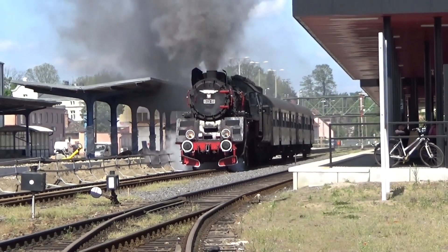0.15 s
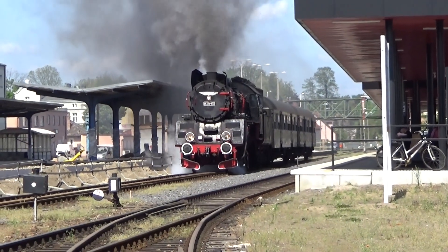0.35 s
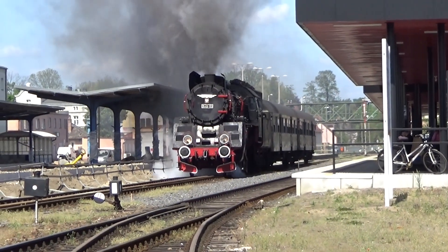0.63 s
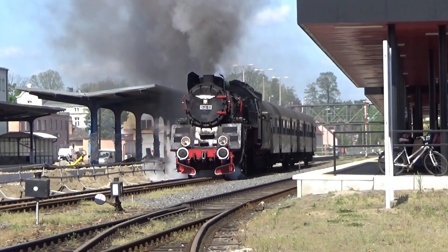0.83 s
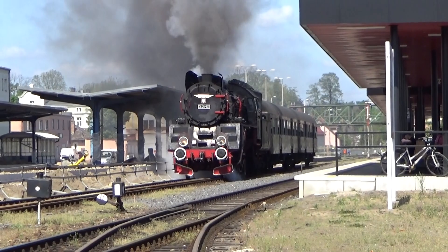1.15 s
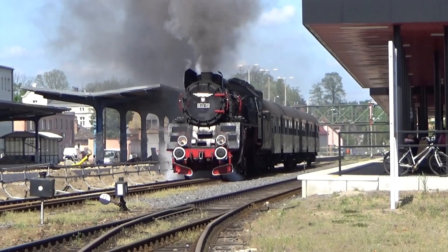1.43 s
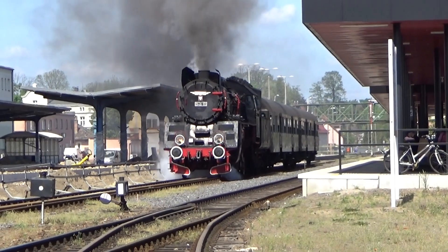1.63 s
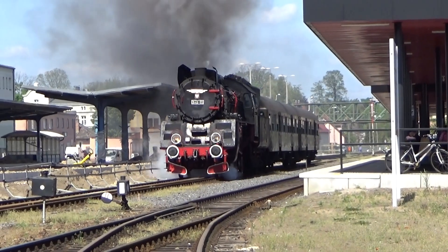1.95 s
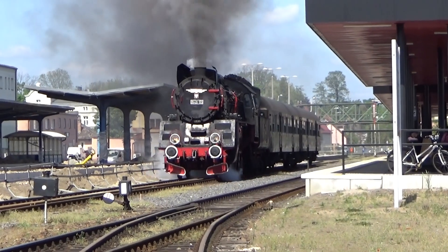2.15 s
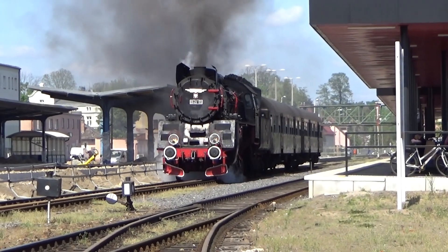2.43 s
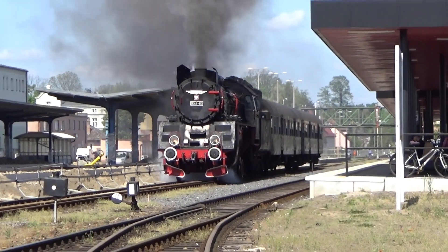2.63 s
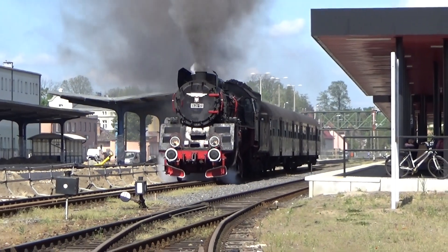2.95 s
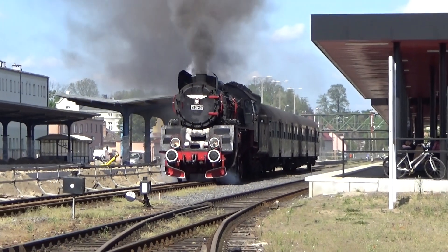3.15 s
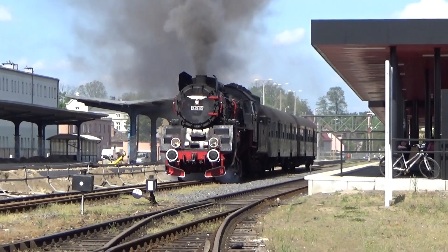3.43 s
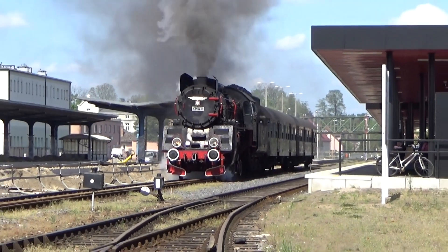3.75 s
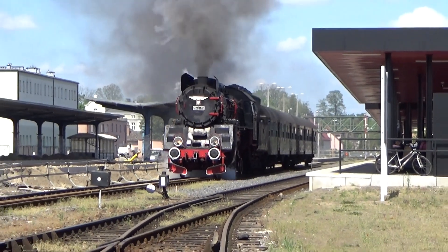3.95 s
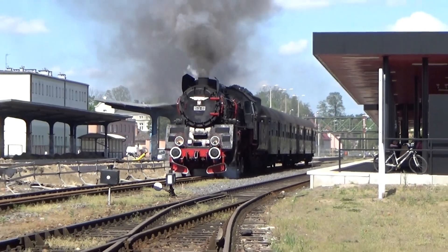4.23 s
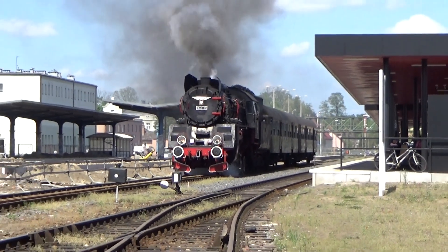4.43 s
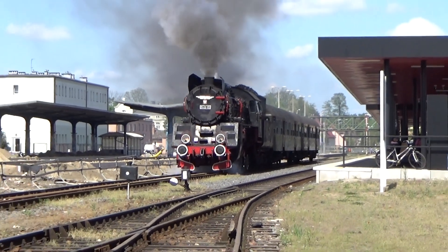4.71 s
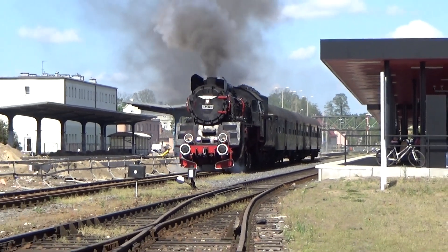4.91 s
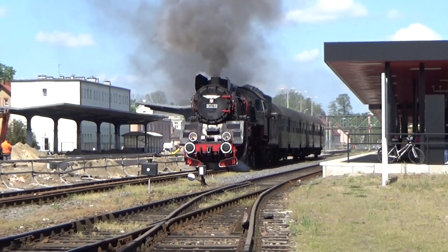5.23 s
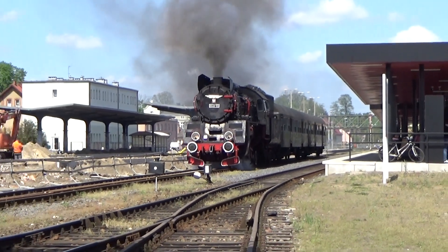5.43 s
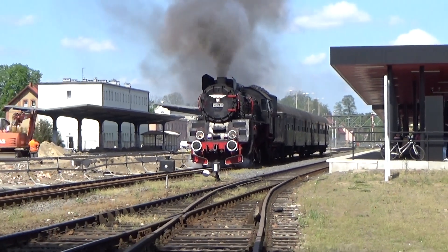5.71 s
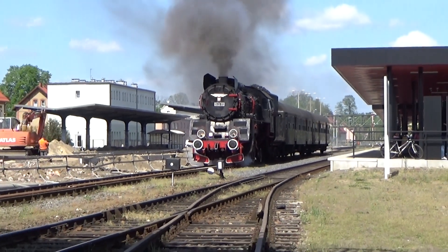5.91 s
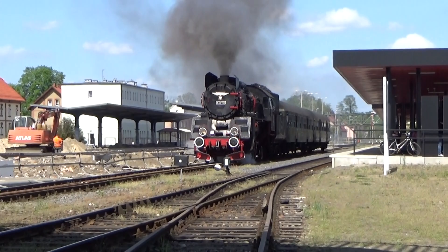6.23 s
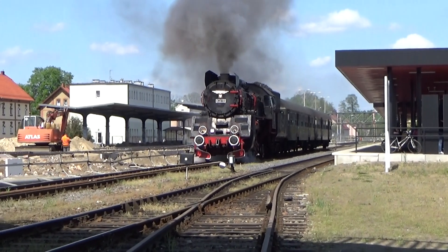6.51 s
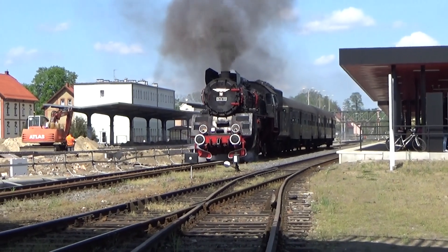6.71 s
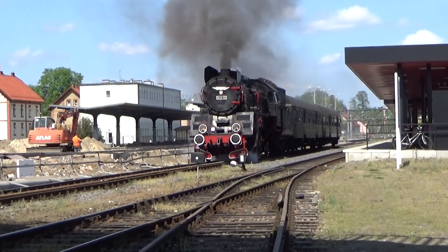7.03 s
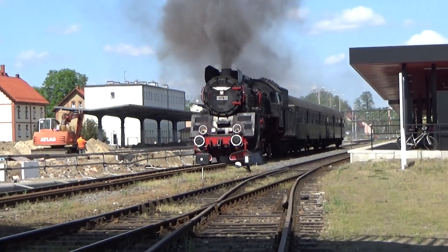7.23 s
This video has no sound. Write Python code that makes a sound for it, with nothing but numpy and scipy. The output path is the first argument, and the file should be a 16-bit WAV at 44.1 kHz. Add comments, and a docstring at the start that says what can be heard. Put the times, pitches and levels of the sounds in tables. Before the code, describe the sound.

Heard from beside the track ahead of a departing steam locomotive, rough bursts of hissing steam dominate, pulsing in an even, alternating rhythm. Almost at once, muffled chimney chuffs and scattered dull metal clanks join in. A continuous steam leak and boiler roar fill the gaps, over a very faint rumble and electric hum. The open station adds a short echo, and the sound gradually swells and widens.

```python
"""A steam locomotive pulls slowly out of a station toward the listener. From the start its open drain
cocks blow turbulent, hissing jets from the two ends of the near cylinder in turn, echoed by the platform
roofs, over the draught's roar, leaking steam, yard rumble and a transformer's hum. After a quarter second
the chimney begins to chuff, four times a wheel turn, and the rods give the first of their dull clanks.
As the engine nears, the jets grow louder and the sound spreads wider."""
import sys
import numpy as np
from scipy import signal
from scipy.fft import rfft, irfft, next_fast_len
from scipy.io import wavfile
from scipy.ndimage import uniform_filter1d, map_coordinates

SR = 44100
rng = np.random.default_rng(int(sys.argv[2]) if len(sys.argv) > 2 else 0)


def dump(signal):
    """Clip the signal to [-1, 1] and save it as 16-bit WAV at the path in sys.argv[1]."""
    limited = np.clip(np.atleast_2d(signal).T, -1, 1)
    pcm = np.round(limited * 32767).astype(np.int16)
    wavfile.write(sys.argv[1], SR, pcm)


N = 325017

# All levels are relative. Blows, rear and front cock in turn: t/s, open/s, level/dB, fizz/dB, body/dB
BLOWS = [(-0.2, 0.31, -26.5, -2.5, -2), (0.282, 0.37, -23.5, 0, 1), (0.76, 0.4, -27, 0.5, -1.5),
         (1.334, 0.34, -24.5, 1, 1.5), (1.824, .39, -27, 0, 1.5), (2.38, 0.35, -22.5, 0, 1),
         (2.853, 0.41, -25, 0.5, -0.5), (3.399, 0.34, -22, 2, -1.5), (3.878, .41, -24, 0, 1),
         (4.418, 0.35, -20.5, .5, 0.5), (4.866, .4, -23, 0.5, -2), (5.403, 0.38, -19.5, 1.5, -1),
         (5.831, .44, -23, 0.5, 0.5), (6.368, .42, -22, 3, 0.5), (6.81, 0.45, -25, 3.5, -2.5)]
# Valve action: rise/s, swell/(dB/s), extra fizz swell/(dB/s), extra body swell/(dB/s), fall/(dB/s), knee/s
FRONT_VALVE = (.115, -1.5, -5.5, 4.5, 165, 0.0466)
REAR_VALVE = (0.16, 7.5, -9.5, -4, 98, 0.0136)
# Noise spectra: f/Hz, level/dB
FRONT_JET_SPECTRUM = [(410, -31), (700, -9.5), (747, -16), (1130, -6.5), (1600, -4.5), (2330, -5),
                      (2730, -2.5), (3180, -2.5), (4880, -2.5), (7290, -3), (8090, -5), (9570, -6),
                      (11800, -19), (14500, -47), (15500, -55.5)]
REAR_JET_SPECTRUM = [(410, -58), (700, -15.5), (787, -38), (968, -13), (1120, -5.5), (1430, -10),
                     (1670, -3), (2100, -6.5), (2830, -3), (4520, -0.5), (5280, -3.5), (5700, -1.5),
                     (9570, -6.5), (12600, -21), (15500, -53)]
ECHO_SPECTRUM = [(300, -59.5), (800, -33), (1200, -10.5), (2200, -6), (2900, -3.5), (4400, -2), (6000, -5),
                 (9500, -4.5), (12500, -20.5), (15500, -47.5)]
DRAUGHT_SPECTRUM = [(35, -50), (60, -15), (92, -18), (129, -10.5), (163, -8), (249, -1.5), (306, -2),
                    (464, 1.5), (773, -5), (1100, -3.5), (1430, -9), (2420, -120)]
LEAK_SPECTRUM = [(470, -42), (800, -12), (1200, -2.5), (1940, -5.5), (2380, -10), (2920, -3), (3130, -6.5),
                 (4130, -18.5), (6050, -29), (9540, -32.5), (14000, -67.5)]
YARD_SPECTRUM = [(12, -47.5), (20, -19), (83, -1), (130, -3), (170, -27), (290, -120)]
BOOM_SPECTRUM = [(90, -47), (130, -6), (170, 2), (215, 0), (270, -12), (400, -44)]
BARK_SPECTRUM = [(200, -23.5), (280, -0.5), (330, -8), (480, -14), (700, -6), (1200, -45)]
# Likeness of left and right: f/Hz, coherence
NEAR_COHERENCE = [(60, 1), (300, 1), (500, 0.978), (700, 0.83), (1000, 0.94), (1400, 0.91), (3000, 1),
                  (7000, 0.96), (9600, 0.967), (10500, 1)]
REAR_COHERENCE = [(700, 1), (1400, 0.9), (3000, 1), (4500, 0.91), (7000, 0.98), (9600, 0.94), (10500, 1)]
FAR_COHERENCE = [(300, .97), (700, 0.88), (1400, 0.94), (2200, 0.63), (3500, 0.39), (7000, 0.54), (9600, 1),
                 (10500, 1)]
# Resonances under the engine and of the chimney pipe: f/Hz, bandwidth/Hz, base lift/dB
CASING_MODES = [(2680, 510, 3), (3691, 710, 2.5), (4900, 450, 2), (5800, 690, 1.85), (8270, 320, 2.5)]
CHIMNEY_MODES = [(166, 20, 2), (311, 37, 3.5), (506, 21, 1)]
# The engine's approach: t/s, factor on the casing's lift, stereo width/dB
APPROACH = [(0, 1.75, -1.5), (2.5, 1.6, 0.5), (4, 1.45, 1), (7.37, 1.3, 2)]
# Reverberation under the roofs: f/Hz, T60/s
ROOF_DECAY = [(800, 0.96), (3000, 0.45), (10000, 0.12)]
# Continuous flows from the boiler: t/s, draught level/dB, leak level/dB
BOILER_LEVELS = [(0.0, -35, -28.5), (0.7, -38, -31.5), (1.6, -35.5, -27.5), (1.9, -37.5, -29.5),
                 (2.4, -36.5, -28), (6.4, -33, -26), (7.37, -36, -27)]
# Transformer hum: t/s, level/dB
HUM_LEVELS = [(0, -58.5), (3.5, -58.5), (4.5, -61), (7.37, -64)]
# Exhaust beats: t/s, level/dB, boom f/Hz, extra bark level/dB
EXHAUST_BEATS = [(0.249, -38, 200, 2), (0.493, -41, 173, 0), (0.739, -40, 147, 4), (1.0, -36, 200, 10),
                 (1.288, -40, 167, 7), (1.529, -39, 146, 4), (1.789, -45, 199, 0), (2.029, -33, 168, 4),
                 (2.319, -34.5, 180, 4), (2.559, -39.5, 142, 5.5), (2.799, -43, 156, 1),
                 (3.049, -31.5, 197, 7), (3.359, -37, 194, 13.5), (3.611, -34, 197, -2.5),
                 (3.86, -40, 194, -5), (4.099, -38, 154, 10), (4.379, -33, 151, -3), (4.61, -35, 162, 3),
                 (4.841, -31, 182, -1), (5.088, -33, 173, 6), (5.36, -36, 200, 12), (5.599, -39, 200, -4),
                 (5.85, -32.5, 155, 4), (6.05, -30, 215, 3), (6.368, -29.5, 166, 0), (6.589, -44, 201, 4),
                 (6.849, -35, 191, 7), (7.02, -38, 207, 3), (7.318, -29, 197, -2)]
# Impacts as the rods take up slack: t/s, level/dB
CLANKS = [(0.2545, -19.5), (0.7446, -23), (1.289, -24.5), (2.8724, -26.5), (4.001, -25), (4.7519, -31),
          (6.341, -28), (7.327, -19.5)]
# Modes of the rods: f/Hz, level/dB, T60/s
ROD_MODES = [(1166, 6, 0.098), (1247, 7, 0.095), (1320, -1, .07)]
# Stereo balance: f/Hz, left minus right level/dB
BALANCE = [(200, 0), (400, -.6), (700, -1.2), (1300, -1.1), (2400, -.5), (4400, -.2), (8000, -.8),
           (12000, 0)]

FRAME = 512  # samples in a short-time spectrum
FRAME_HZ, FRAME_S = np.fft.rfftfreq(FRAME, 1 / SR), np.arange(N // (FRAME // 2) + 2) * (FRAME // 2) / SR


def amp(db):
    return 10 ** (np.asarray(db) / 20)


def unit_rms(x):
    return x / np.sqrt(np.mean(x ** 2) + 1e-20)


def along(points, hz):
    """Interpolation of (f/Hz, value) points on a logarithmic frequency axis."""
    f, values = np.transpose(points)
    return np.interp(np.log(hz + 1), np.log(f + 1), values)


def curves(rows):
    """Linear interpolation in time: one value per sample for each column after t/s."""
    times, *columns = np.transpose(rows)
    return [np.interp(np.arange(N) / SR, times, column) for column in columns]


def wobble(knots_per_s):
    """Smooth random modulation: a spline through Gaussian knots."""
    knots = rng.standard_normal(int(N * knots_per_s / SR) + 4)
    return map_coordinates(knots, [np.arange(N) * knots_per_s / SR])


def resonance_db(modes, hz):
    """Resonance: each mode adds a Lorentzian peak to the level."""
    return sum(db / (1 + (2 * (hz - centre) / width) ** 2) for centre, width, db in modes)


def filtered(x, response):
    """Linear filtering: the spectrum is multiplied by a frequency response."""
    size = next_fast_len(N + SR // 4)
    return irfft(rfft(x, size) * response(np.fft.rfftfreq(size, 1 / SR)), size)[..., :N]


def noise(spectrum, coherence, patchy_db, gain=1, modes=()):
    """Partly coherent stereo noise, modulated by random patches and a gain over frequency and time."""
    def response(hz):
        angle = np.arccos(np.clip(along(coherence, hz), -1, 1)) / 2
        return amp(along(spectrum, hz) + resonance_db(modes, hz)) * [np.cos(angle), np.sin(angle)]

    mid, side = filtered(rng.standard_normal((2, N)), response)
    frames = signal.stft(unit_rms(np.array([mid + side, mid - side])), SR, nperseg=FRAME)[2]
    patches = uniform_filter1d(rng.standard_normal(frames.shape[1:]), size=5, axis=0)
    patches = unit_rms(uniform_filter1d(patches, size=20, axis=1))
    return signal.istft(frames * amp(patchy_db * patches) * gain, SR, nperseg=FRAME)[1][:, :N]


def jet_power(blows, valve):
    """A valve throttles a jet: its power rises, swells or sags, then falls, coloured by casing resonance."""
    rise_s, swell, fizz_swell, body_swell, fall, knee_s = valve
    hz = FRAME_HZ[:, None]
    fizz, body = np.clip((hz - 4500) / 5000, 0, 1.5), hz < 2300  # weights of the high and low bands
    fall_rate = fall * np.where(body, 0.56, 1)  # the body dies slower than the hiss
    seep_db = -37 + 1.39 * FRAME_S - 1.5 * fizz  # steam still passes between blows
    power = amp(2 * seep_db)
    for start, open_s, jet_db, fizz_db, body_db in blows:
        age = FRAME_S - start
        opening = np.sin(np.pi / 2 * np.clip(age / rise_s, 0, 1)) ** 4
        held_db = (swell + fizz_swell * fizz + body_swell * body) * np.clip(age, 0, open_s)
        shut_db = fall_rate * knee_s * np.logaddexp(0, (age - open_s) / knee_s)
        power += opening * amp(2 * (jet_db + fizz_db * fizz + body_db * body + held_db - shut_db))
    times, ring_depth, _ = np.transpose(APPROACH)
    return power * amp(2 * resonance_db(CASING_MODES, hz) * np.interp(FRAME_S, times, ring_depth))


def roof_echo(power, delay_s=0.05):
    """Reverberation: the roofs return the jets' power late and wide, the treble decaying fastest."""
    taps = 200
    lag = FRAME_S[:taps] - delay_s
    tail = amp(-120 * lag / along(ROOF_DECAY, FRAME_HZ)[:, None]) * (lag >= 0)
    padded = np.pad(power, ((0, 0), (taps, 0)), "edge")
    late = signal.fftconvolve(padded, tail / tail.sum(1, keepdims=True), axes=1)
    gain = np.sqrt(np.abs(late[:, taps:taps + len(FRAME_S)]))
    return amp(-6.5) * noise(ECHO_SPECTRUM, FAR_COHERENCE, patchy_db=1.1, gain=gain)


def drain_cocks():
    """Turbulent jet noise: the two cocks blow on alternate half turns of the wheel, and the roofs echo."""
    rear_power, front_power = jet_power(BLOWS[::2], REAR_VALVE), jet_power(BLOWS[1::2], FRONT_VALVE)
    front = noise(FRONT_JET_SPECTRUM, NEAR_COHERENCE, patchy_db=1.4, gain=np.sqrt(front_power))
    rear = noise(REAR_JET_SPECTRUM, REAR_COHERENCE, patchy_db=1.17, gain=np.sqrt(rear_power))
    sputter = amp(0.13 * wobble(14) + 0.402 * wobble(300))  # water drops tear the jet
    return sputter * (front + rear) + roof_echo(front_power + rear_power)


def boiler():
    """Flow noise: the draught excites the chimney's open-pipe modes while steam leaks without pause."""
    draught_db, leak_db = curves(BOILER_LEVELS)
    surge = amp(draught_db + 0.57 * wobble(5))
    draught = surge * noise(DRAUGHT_SPECTRUM, NEAR_COHERENCE, patchy_db=0.83, modes=CHIMNEY_MODES)
    leak = amp(leak_db - 3) * noise(LEAK_SPECTRUM, FAR_COHERENCE, patchy_db=2.2)
    return draught + leak


def yard_rumble():
    """Ambient noise: the yard gives a faint floor of low frequencies."""
    return amp(-61) * noise(YARD_SPECTRUM, NEAR_COHERENCE, patchy_db=0.5)


def transformer(hum_hz=100.3):
    """Amplitude and phase modulation: a mains hum wavers on its way through the air."""
    phase = 2 * np.pi * hum_hz * np.arange(N) / SR + 0.52 * wobble(3.16)
    level_db = curves(HUM_LEVELS)[0] + 1.5 * wobble(2.66)
    return np.sqrt(2) * amp(level_db) * np.sin(phase)


def chuffs(mean_bark_hz=309.8, bark_scatter=0.115):
    """Pulsed excitation: each exhaust beat sounds the chimney's boom and bark, each as noise and a tone."""
    boom, bark, tones = np.zeros((3, N + SR))
    t = np.arange(SR // 3) / SR
    swell = (t / 0.043 * np.exp(1 - t / 0.035)) ** 1.13
    for start, db, boom_hz, bark_db in EXHAUST_BEATS:
        boom_phase, detune, bark_phase = rng.uniform(-0.997, 1, 3)
        bark_hz = mean_bark_hz * (1 + bark_scatter * detune)
        span = slice(round(start * SR), round(start * SR) + len(t))
        boom[span] += amp(db - 8.5) * swell
        bark[span] += amp(db + bark_db - 12.5) * swell
        tones[span] += amp(db - 7) * swell * np.sin(np.pi * (2 * boom_hz * t + boom_phase))
        tones[span] += amp(db + bark_db - 10) * swell * np.sin(np.pi * (2 * bark_hz * t + bark_phase))
    boom_noise = noise(BOOM_SPECTRUM, NEAR_COHERENCE, patchy_db=0.5)
    bark_noise = noise(BARK_SPECTRUM, NEAR_COHERENCE, patchy_db=0.5)
    return boom[:N] * boom_noise + bark[:N] * bark_noise + tones[:N]


def rods():
    """Damped free vibration: the heavy, oiled rods clank dully as the load reverses."""
    clanks, t = np.zeros(N + SR), np.arange(SR // 4) / SR
    attack = 1 - np.exp(-t / 0.0062)
    for start, db in CLANKS:
        ring = sum(amp(mode_db + rng.normal(0, 1.3) - 60 * t / t60) * np.sin(2 * np.pi * hz * t)
                   for hz, mode_db, t60 in ROD_MODES)
        clanks[round(start * SR):][:len(t)] += amp(db - 5.5) * ring * attack
    return clanks[:N]


def scene():
    """Superposition: the sources add, and the stereo image widens as the train nears."""
    left, right = drain_cocks() + boiler() + yard_rumble() + chuffs() + rods() + transformer()
    width = amp(curves(APPROACH)[1])
    mid, side = (left + right) / 2, (left - right) / 2 * width
    return np.array([mid + side, mid - side])


def record(dry, top_hz=15600):
    """Level difference and band limit: the right channel is slightly louder, and both end at top_hz."""
    return filtered(dry, lambda hz: amp(along(BALANCE, hz) * [[.5], [-.5]]) * (hz < top_hz))


dry = scene()
out = record(dry)
dump(out)
```